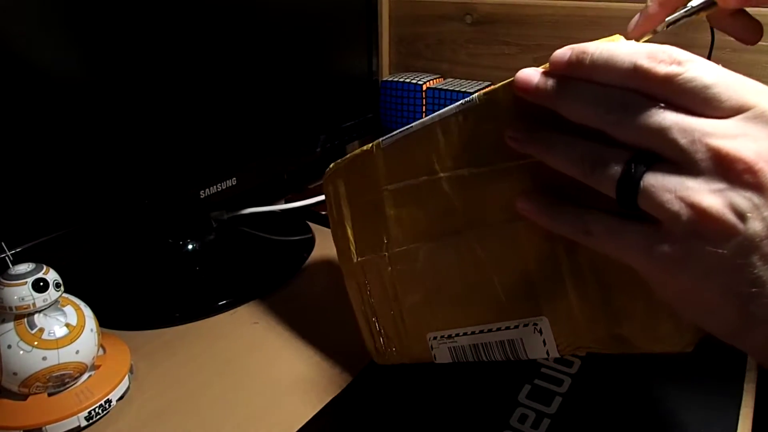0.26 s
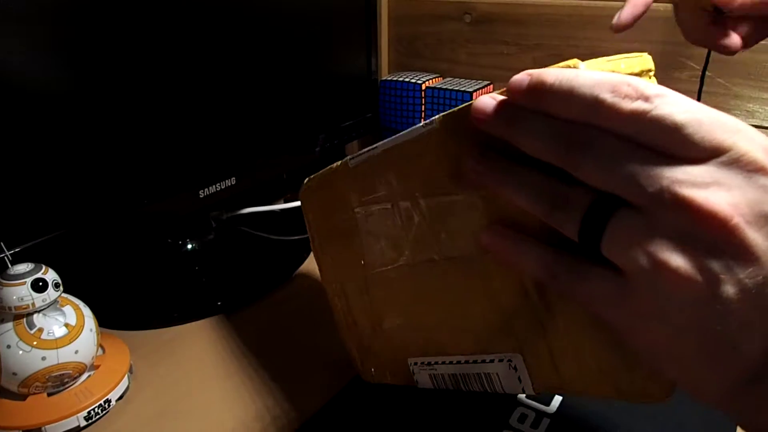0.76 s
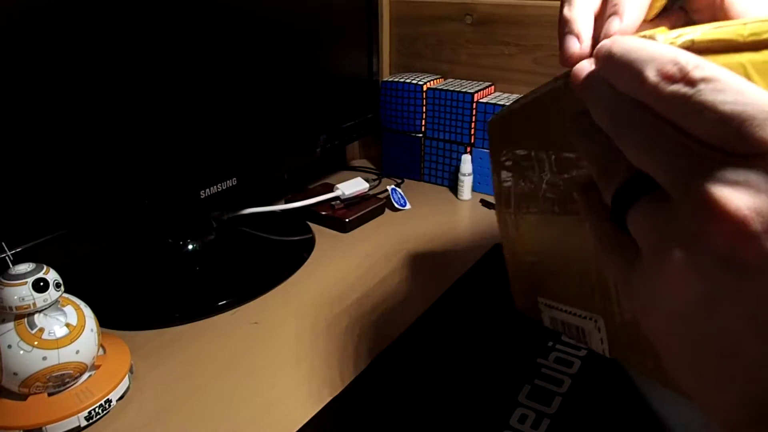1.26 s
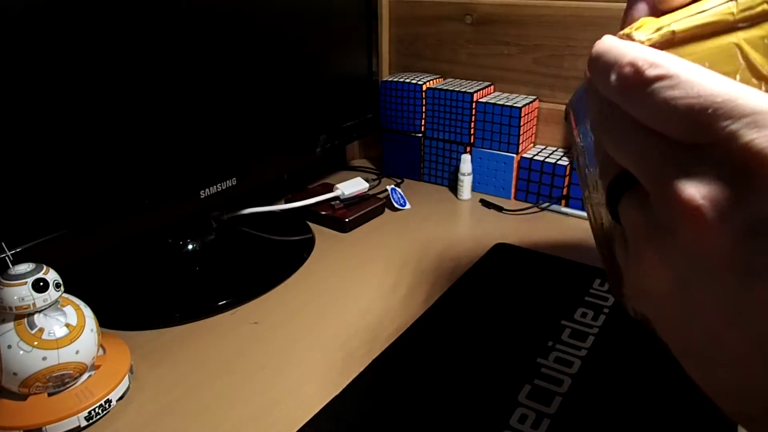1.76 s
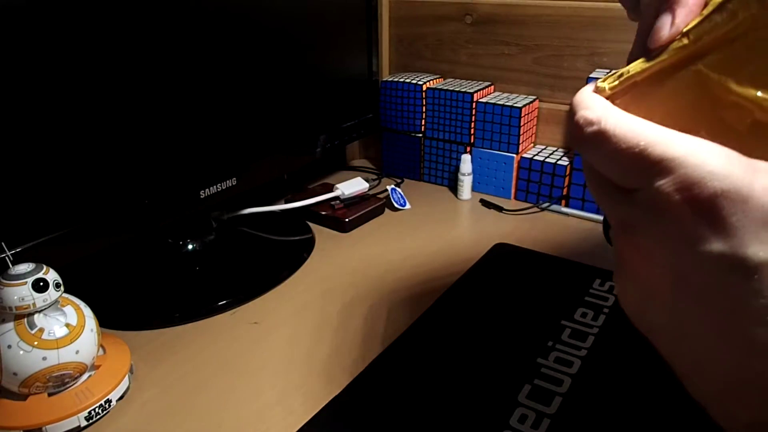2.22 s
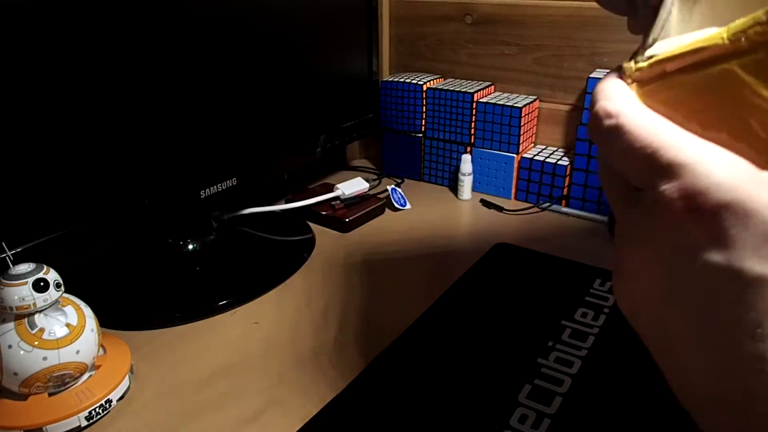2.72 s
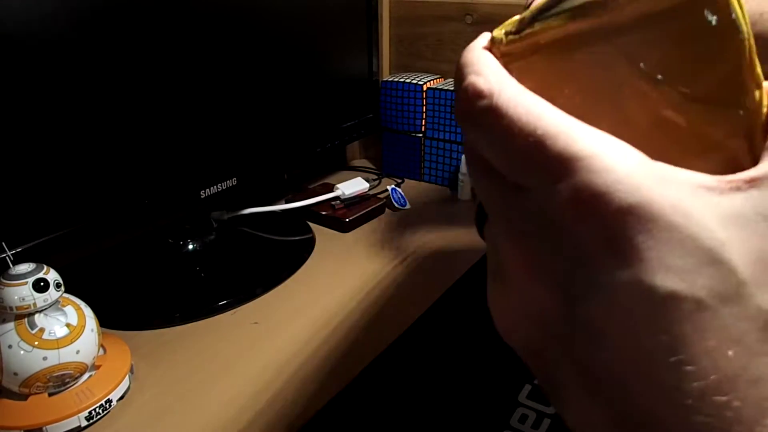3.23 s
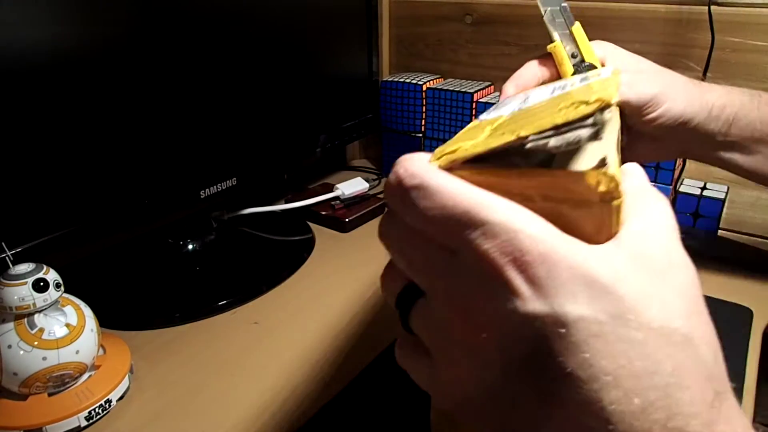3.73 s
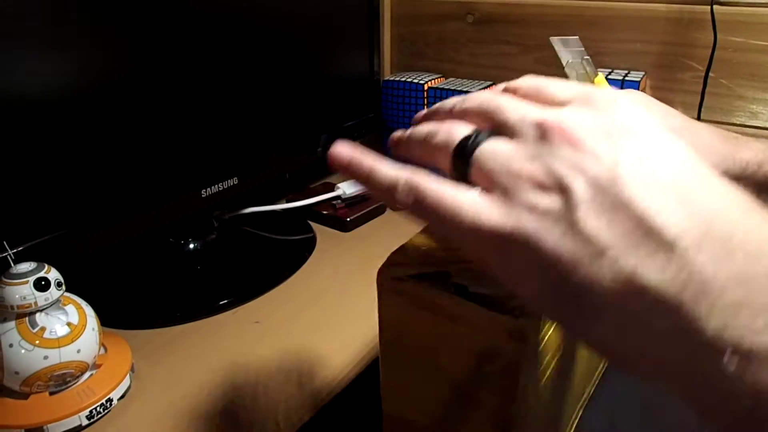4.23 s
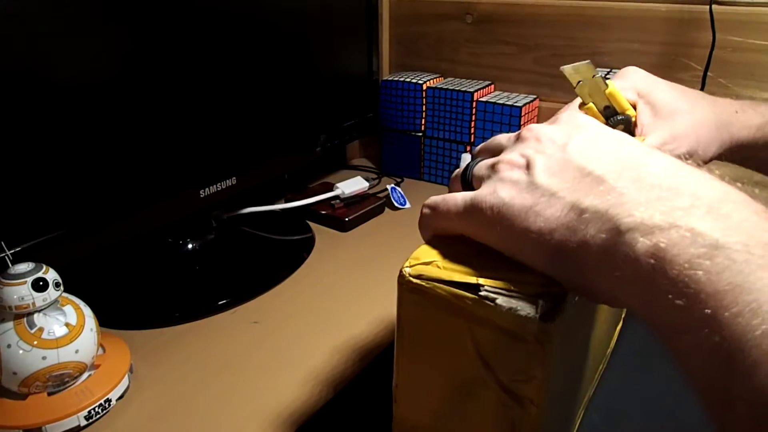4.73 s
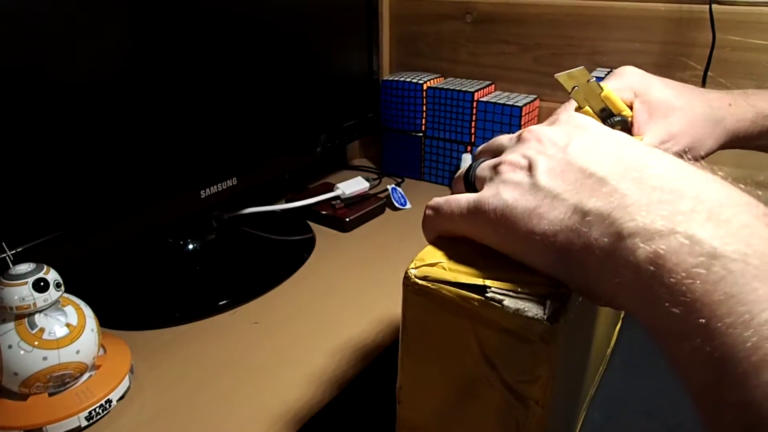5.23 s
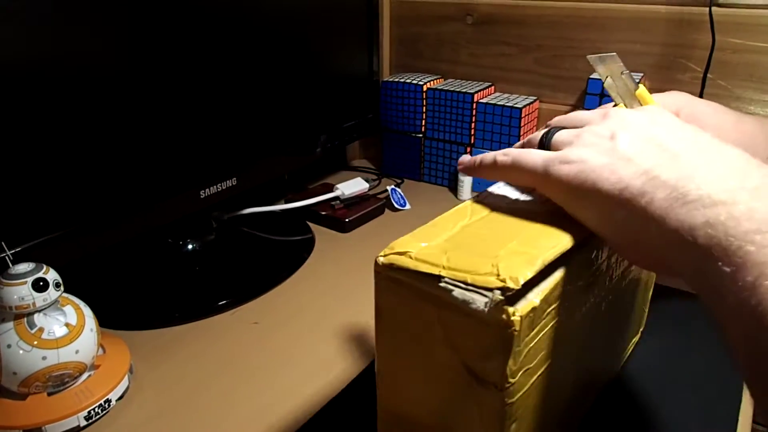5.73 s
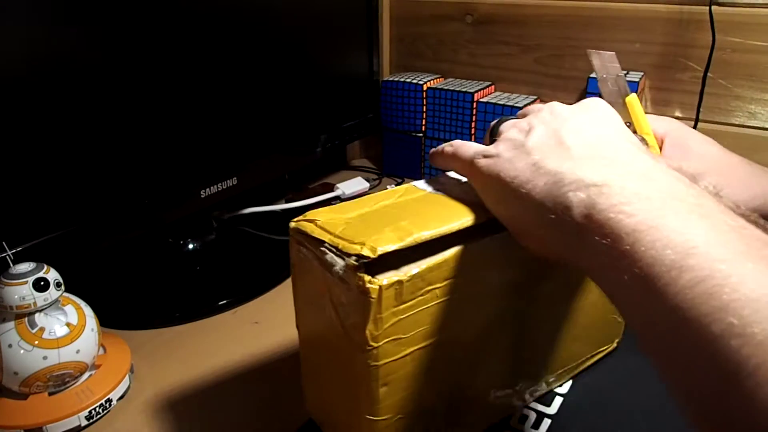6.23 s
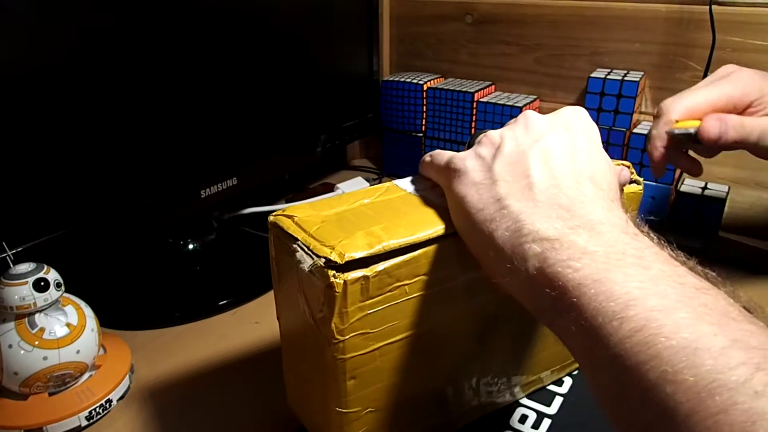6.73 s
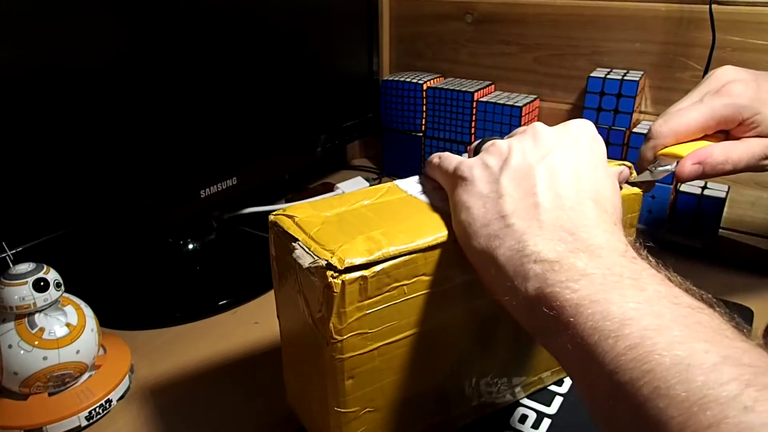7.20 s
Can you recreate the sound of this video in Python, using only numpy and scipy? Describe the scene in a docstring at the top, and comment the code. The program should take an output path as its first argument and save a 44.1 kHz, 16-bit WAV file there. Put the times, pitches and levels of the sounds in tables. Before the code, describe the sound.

A taped cardboard parcel is handled close up on a desk in a small room, over a steady, faint computer hum and hiss. A knife clicks and nicks the tape, then slits it with a short, juddering rasp from 0.3 to 0.5 seconds, ending in a hollow knock. Fingers slide over crinkling wrapping with scattered ticks and taps, and a sharp knock comes at 2.2 seconds. Crisp clicks at 2.5 seconds lead into a second brief slit, finished by 2.8. After more rubbing, the box is set down at about 4 seconds with clicks and a low thump in the desk top. A flap creaks briefly around 4.6 seconds, followed by a quick run of small knocks and clicks until 5. Softer hand strokes and occasional taps continue, with a last cluster of sharp clicks and scrapes just after 7 seconds.

```python
"""Opening a taped parcel on a desk

Close up in a small room, a snap-off knife clicks in its handle and slits the tape twice, its blade
catching on fibres. Fingers slide over the crinkling wrapping, and knocks ring the cardboard panels.
The box is set down with a thump that swings the desk top, then a flap creaks under the hand.
A computer hums behind."""
import sys
import numpy as np
from scipy import signal
from scipy.fft import rfft, irfft, next_fast_len
from scipy.io import wavfile

SR = 44100
rng = np.random.default_rng(int(sys.argv[2]) if len(sys.argv) > 2 else 0)


def store_wav(level_fs):
    """Save 16-bit WAV to argv[1]."""
    pcm = np.round(np.clip(np.atleast_2d(level_fs), -1, 1) * 32767)
    wavfile.write(sys.argv[1], SR, pcm.T.astype(np.int16))


N = 328986
T = np.arange(N) / SR


def undb(db):
    """Decibels to gain."""
    return 10 ** (np.asarray(db) / 20)


def unit(x):
    """Scale to rms 1."""
    return x / np.sqrt(np.mean(x ** 2) + 1e-20)


def curves(table):
    """Turn rows that begin with a time into one automation curve per remaining column."""
    times, *columns = np.transpose(table)
    return [np.interp(T, times, column) for column in columns]


def gains(eq, hz):
    """Gain of an EQ curve of (Hz, dB) points at the given frequencies."""
    points_hz, db = np.transpose(eq)
    return undb(np.interp(np.log(hz + 1), np.log(points_hz), db))


def colour(x, eq, size=2048):
    """Minimum-phase EQ: it rings only after a blow."""
    cepstrum = irfft(np.log(gains(eq, np.fft.rfftfreq(size, 1 / SR))))
    cepstrum[1:size // 2] *= 2
    cepstrum[size // 2 + 1:] = 0
    return signal.oaconvolve(x, irfft(np.exp(rfft(cepstrum))))[:len(x)]


def band(x, lo_hz, hi_hz, order=4):
    """Band-pass."""
    return signal.sosfilt(signal.butter(order, [lo_hz, hi_hz], "band", fs=SR, output="sos"), x)


def ringing(x, rings):
    """Add narrow resonances to a force."""
    return x + sum(undb(db) * signal.lfilter(*signal.iirpeak(hz, hz / width, SR), x)
                   for hz, width, db in rings)


def walk(per_s):
    """Smooth random wander of spread near 1."""
    steps = rng.standard_normal(4096)
    return 1.2 * np.interp(T * per_s, np.arange(len(steps)), steps)


def add(out, start, x):
    """Mix in a short sound at a start time in seconds."""
    i = int(start * SR)
    out[i:i + len(x)] += x[:N - i]


# EQ of the fan's rush and of the hiss. Each row: frequency in Hz, gain in dB.
FAN_EQ = [(12, -56), (20, -27.5), (43, -10), (97, -8), (196, -9.5), (267, -11), (371, -12), (405, -11.5),
          (483, -13.5), (515, -15.5), (550, -16), (873, -17.5), (1140, -19), (1690, -23.5), (3800, -38),
          (4940, -88), (8360, -120)]
HISS_EQ = [(2120, -15.5), (3600, -23), (3880, -11.5), (4340, -15), (4480, -1), (4830, -2), (5110, 9),
           (5470, 6), (6550, -0.5), (7710, 4.5), (9070, -2), (11000, -3), (11900, -4.5), (15000, -4.5),
           (16000, -15.5)]
# The computer's hum and whine. Each row: frequency in Hz, level in dB.
HUM_TONES = [(60, -66), (120, -62.5), (405, -63.5), (522.1, -52.5)]

def background():
    """A computer fan rushes and hums, wavering slightly, over a wide bed of microphone hiss."""
    def fan():
        return unit(colour(rng.standard_normal(N), FAN_EQ)) * undb(-53 + 0.5 * walk(0.94))

    def hiss():
        return unit(colour(rng.standard_normal(N), HISS_EQ)) * undb(-55)

    hum = np.zeros(N)
    for hz, db in HUM_TONES:
        peak = np.sqrt(2) * undb(db + 0.23 * walk(4.4))
        hum += peak * np.sin(2 * np.pi * hz * T + 0.044 * walk(2.1))
    mid = fan() + hiss() + hum
    side = undb(-3) * fan() + undb(-1.5) * hiss()
    return np.array([mid + side, mid - side])


def hardness(decay_s):
    """1 for a sharp release, less for a drawn-out crunch."""
    return min(0.0012 / decay_s, 1)


def release(decay_s, chatter, strike):
    """Force of a sudden release: a sharp strike, a short crunch, then weaker chatter through the flaps."""
    t = T[:4096]
    attack = np.minimum(t / .0004, 1)
    fade = np.exp(-t / decay_s) + chatter * np.exp(-t / .008)
    force = rng.standard_normal(len(t)) * attack * fade
    force /= np.linalg.norm(force)
    force[SR // 2000] += strike
    return force


# Panel resonances under blows and scrapes. Each row: frequency in Hz, width in Hz, gain in dB.
PANEL_RINGS = [(142.2, 8, -6.5), (302, 28, -1.5), (813, 64, -10), (1037, 120, -26), (1560, 15, -1.5),
               (1664, 55, 1)]
# EQ of a cardboard knock and of a tape or knife click. Each row: frequency in Hz, gain in dB.
KNOCK_EQ = [(100, -4), (200, -5.5), (300, -2), (480, 1), (650, 1.5), (900, 6.5), (1200, 3), (1400, 7.5),
            (1650, 2.5), (1900, -4.5), (2700, -12), (3600, -5.5)]
CLICK_EQ = [(1500, -44.5), (2200, -14), (3100, -14), (3900, -19), (4600, 1), (4870, 5), (5300, 13.5),
            (5750, 8), (6600, -3.5), (7900, -3.5), (9300, -19.5), (16000, -28.5)]

def snap(boom_db, knock_db, click_db, spit_db, decay_s):
    """A release booms and knocks in the box and clicks at its source; the treble spit dies first."""
    blow = release(decay_s + 0.0024, chatter=.18, strike=.97 * hardness(decay_s))
    box = colour(ringing(blow, PANEL_RINGS), KNOCK_EQ)
    spot_ring = [(rng.uniform(1800, 3490), 160, 4)]  # each spot of the wrapping has its own pitch
    crunch = release(decay_s, chatter=.1, strike=.45)
    click = colour(ringing(crunch, spot_ring), CLICK_EQ)
    spit = colour(release(.8 * decay_s, chatter=.08, strike=1.3), CLICK_EQ)
    layers = [(band(box, 122, 545, order=3), boom_db), (band(box, 573, 2970, order=3), knock_db),
              (band(click, 1800, 8700, order=3), click_db), (band(spit, 8320, 16000, order=3), spit_db)]
    # each level sets the first 10 ms of its layer
    return sum(x * undb(db) / np.sqrt(np.mean(x[:SR // 100] ** 2)) for x, db in layers)


# Each row: start in seconds, click level in dB, treble spit level in dB, decay in seconds.
CLICK_CUES = [(0.045, -40, -72, 0.005), (0.18, -31.5, -58, 0.0047), (0.2421, -34.5, -46, 0.014),
              (0.8164, -39.5, -46.5, 0.0032), (1.0293, -45, -48, 0.0044), (1.2375, -43, -39.5, 0.01),
              (1.4508, -39.5, -39, 0.0074), (1.5221, -30.5, -53, 0.00055), (1.5525, -48, -41, 0.00058),
              (1.7964, -39, -44, 0.0018), (1.9781, -48, -45, 0.001), (2.3467, -42.5, -41.5, 0.00062),
              (2.5181, -30, -37, 0.0024), (2.5302, -34, -35, 0.0046), (2.587, -34, -37, 0.0014),
              (2.614, -27, -31, 0.0006), (2.7811, -34.5, -40, 0.00081), (2.871, -50, -48, 0.001),
              (3.4622, -42, -44, 0.0037), (3.9827, -32.5, -57, 0.00087), (4.0207, -28, -61, 0.001),
              (4.0763, -21.5, -56, 0.0006), (4.452, -40, -47, 0.0075), (4.6176, -30, -45, 0.00031),
              (4.729, -25, -44, 0.0027), (4.8003, -28.5, -45, 0.00056), (4.9351, -29.5, -36, 0.003),
              (4.9744, -27, -38.5, 0.00029), (5.4465, -37, -62, 0.0042), (5.6774, -38.5, -39, 0.0042),
              (5.6942, -40.5, -54, 0.001), (6.0626, -43.5, -51, 0.0012), (6.473, -44.5, -58, 0.001),
              (7.096, -38.5, -46, 0.0027), (7.1598, -38, -67, 0.0019), (7.187, -29, -37.5, 0.0055),
              (7.2096, -34.5, -46, 0.0039), (7.2813, -31.5, -47, 0.0045), (7.3277, -42, -37, 0.0015),
              (7.3554, -25.5, -63, 0.0011)]

def clicks():
    """Sharp clicks of tape and knife, and of the flap as it slips its last, barely stirring the box."""
    out = np.zeros(N)
    for start, click_db, spit_db, decay_s in CLICK_CUES:
        boom_db, knock_db = click_db - 27.5, click_db - 19.5
        add(out, start, snap(boom_db, knock_db, click_db, spit_db, decay_s))
    return out


# Each row: start in seconds, levels of boom, knock and click in dB, crunch decay in seconds.
KNOCK_CUES = [(0.1431, -42, -39, -38, 0.0039), (0.4605, -25, -21, -36, 0.0011),
              (0.725, -55, -48, -52, 0.0026), (1.25, -67, -43.5, -49, 0.0052),
              (1.413, -40, -31, -31, 0.0015), (1.493, -34, -45, -65, 0.0039),
              (2.2195, -29, -18, -21.5, 0.0012), (2.6335, -33, -27.5, -19.5, 0.0021),
              (3.3009, -41.5, -38, -43.5, 0.0043), (3.482, -37, -48, -57, 0.0026),
              (3.611, -40, -45, -57, 0.0027), (4.0095, -32.5, -42, -30.5, 0.0028),
              (4.0912, -30, -38.5, -57, 0.003), (4.704, -34.5, -49, -54, 0.0019),
              (4.7472, -34.5, -44, -43, 0.0023), (4.7903, -34.5, -40.5, -45, 0.0015),
              (4.833, -33, -42, -40, 0.0015), (4.8713, -35, -40.5, -41.5, 0.003),
              (4.913, -34, -39, -43, 0.0015), (4.982, -33, -38, -48, 0.0021),
              (5.233, -39, -40.5, -51, 0.0049), (5.3124, -48, -45, -38.5, 0.0013),
              (5.523, -41, -52, -44.5, 0.0013), (5.605, -51, -40, -35, 0.0025),
              (6.383, -41, -40, -47.5, 0.011), (6.516, -42, -38.5, -37.5, 0.0044),
              (6.6321, -55, -49, -46.5, 0.0026), (6.7574, -43, -40, -34, 0.0069),
              (6.964, -61, -50, -49, 0.005), (7.028, -61, -53, -58, 0.003),
              (7.3187, -49, -38.5, -27, 0.0022)]

def knocks():
    """The box booms as it is knocked or a flap gives way; harder hits spit more treble."""
    out = np.zeros(N)
    for start, boom_db, knock_db, click_db, decay_s in KNOCK_CUES:
        spit_db = click_db - 6 + 20 * np.log10(hardness(decay_s))
        add(out, start, snap(boom_db, knock_db, click_db, spit_db, decay_s))
    return out


def fibres(per_s, spread_db, smooth):
    """Tiny catches of uneven size over a share of smooth friction."""
    sizes = undb(spread_db * np.minimum(rng.exponential(size=N), 3))
    catches = (rng.random(N) < per_s / SR) * sizes * rng.choice([-1, 1], N)
    return unit(catches) + smooth * rng.standard_normal(N)


def stroke(start, length, attack_s, release_s=0.028):
    """Contact builds up, holds, then dies away."""
    rise = np.clip((T - start) / attack_s + .5, 0, 1)
    return rise * np.exp(-np.maximum(T - start - length, 0) / release_s)


def friction(force, board_gain, rasp_gain, board_eq, rasp_eq, board_trim_db, rasp_trim_db):
    """One scraping force shakes the cardboard and rasps at the point of contact."""
    board = unit(band(colour(ringing(force, PANEL_RINGS), board_eq), 60, 2855))
    rasp = unit(band(colour(force, rasp_eq), 2810, 18000))
    return board * board_gain * undb(board_trim_db) + rasp * rasp_gain * undb(rasp_trim_db)


# The nick before each slit. Each row: start and length in seconds, cardboard and rasp faders in dB.
BLADE_NICKS = [(0.148, 0.046, -35.5, -38), (2.508, 0.024, -45, -36.5)]
# The two draws of the blade. Each row: time in seconds, cardboard and rasp faders in dB.
FIRST_DRAW = [(0.29, -50, -50), (0.336, -37.5, -38), (0.358, -33.5, -26.5), (0.396, -23, -22),
              (0.432, -29.5, -18.5), (0.462, -19.5, -17), (0.478, -30.5, -43), (0.49, -47.5, -44)]
SECOND_DRAW = [(2.611, -35, -20.5), (2.633, -33, -17), (2.663, -27, -24.5), (2.679, -22.5, -19),
               (2.709, -31, -24.5), (2.727, -42, -36.5), (2.75, -52, -41)]
# EQ of the cardboard and of the tape rasp at each cut. Each row: frequency in Hz, gain in dB.
FIRST_BOARD_EQ = [(90, -10.5), (200, -9.5), (320, -1), (430, -2), (560, -2), (660, -14), (800, -4),
                  (1100, -13), (1300, -8), (1520, -13), (1850, -17), (2300, -14), (2700, -20.5),
                  (3500, -11)]
FIRST_RASP_EQ = [(2120, -68.5), (3600, -23.5), (4100, -23.5), (4590, -10.5), (5070, -3.5), (5370, -14),
                 (5640, -2), (5970, -15), (6080, -5), (6930, -17), (8210, -15.5), (9070, -24.5),
                 (11100, -29), (15100, -30), (16000, -35)]
SECOND_BOARD_EQ = [(59, -53.5), (100, -52), (174, -9), (210, -41), (309, -5), (349, -13), (440, 4.5),
                   (546, -2), (599, -2), (699, -4), (1040, 2.5), (1150, -5.5), (1770, -5.5), (1910, -7),
                   (4000, -7.5), (5200, -70), (8800, -120)]
SECOND_RASP_EQ = [(2120, -26.5), (3600, -24.5), (3740, -14), (4080, -31.5), (4450, -7), (4770, -20),
                  (4890, -5), (5240, -1), (6930, -11), (8100, -9.5), (9410, -22), (11200, -22.5),
                  (14800, -24), (15700, -31), (16000, -60)]
# Rings the blade draws out. Each row: frequency in Hz, width in Hz, gain in dB.
FIRST_BLADE_RINGS = [(5680, 70, -2), (5440, 60, 6), (6500, 25, -21), (1480, 130, 10.5)]
SECOND_BLADE_RINGS = [(5250, 71, 3), (741, 22, 5), (7450, 30, 5)]

def slit(nick, draw, board_eq, rasp_eq, rings, board_trim_db, rasp_trim_db, judder_db):
    """The blade nicks the tape, then sinks in and parts the fibres in a dense, juddering run."""
    catches = fibres(per_s=3200, spread_db=4.2, smooth=.35)
    force = ringing(catches * undb(judder_db * walk(260)), rings)
    start, length, nick_board_db, nick_rasp_db = nick
    draw_board_db, draw_rasp_db = curves(draw)
    nicking = stroke(start, length, attack_s=0.022)
    bite_s = 0.0041
    drawing = np.clip((T - draw[0][0]) / bite_s, 0, 1) * (T < draw[-1][0])
    board_gain = nicking * undb(nick_board_db) + drawing * undb(draw_board_db)
    rasp_gain = nicking * undb(nick_rasp_db) + drawing * undb(draw_rasp_db)
    return friction(force, board_gain, rasp_gain, board_eq, rasp_eq, board_trim_db, rasp_trim_db)


# The box is jolted, lands, rocks and is leant on.
# Each row: start in seconds, level in dB, centre of the push in Hz.
THUMP_CUES = [(0.461, -43.5, 164), (4.006, -44, 75), (4.034, -31, 68.5), (4.095, -37, 60.7),
              (4.137, -39.5, 70), (4.486, -46.5, 85), (4.791, -46, 85.5), (5.797, -51.5, 132)]
# Each row: frequency in Hz, gain in dB, seconds to fade by 60 dB.
DESK_MODES = [(32.8, -1.5, 1), (61, 14, 0.17), (77.1, 6, 0.32), (116.4, 18.5, 0.13), (147, -18.5, 0.058)]

def thumps():
    """The weight of the box sets the desk top swinging; a quicker push favours its higher modes."""
    out, t = np.zeros(N), T[:SR // 2]
    attack = 1 - np.exp(-t / 0.0069)
    for start, db, push_hz in THUMP_CUES:
        for hz, mode_db, t60 in DESK_MODES:
            share = np.exp(-2.5 * np.log(hz / push_hz) ** 2)
            swing = np.sin(2 * np.pi * hz * t) * np.exp(-np.log(1000) * t / t60) * attack
            add(out, start, undb(db + mode_db) * share * swing)
    return out


# Hand strokes; light, fast ones are glossier than slow pressing.
# Each row: start and length in seconds, cardboard and rasp faders in dB, treble lift in dB.
RUB_CUES = [(0.466, 0.1, -47.5, -48, -1), (0.826, 0.1, -67, -56, 6), (1.412, 0.028, -49.5, -50, -4),
            (1.662, 0.14, -53, -49, 0), (2.347, 0.045, -70, -45.5, 6), (2.443, 0.24, -64.5, -50.5, 17),
            (2.889, 0.065, -56.5, -49, 2), (3.062, 0.15, -49.5, -40.5, 5.5), (3.276, 0.11, -48.5, -48, 5),
            (3.471, 0.16, -47, -46.5, -1), (3.976, 0.05, -44.5, -37.5, -3),
            (4.107, 0.032, -39.5, -35, -0.5), (4.453, 0.46, -51, -46.5, -1), (4.515, 0.1, -44, -67, -17),
            (5.225, 0.115, -47.5, -42.5, -2), (5.384, 0.45, -61, -51, -4), (5.995, 0.31, -68, -47.5, -1),
            (6.488, 0.034, -53, -50, -6), (6.6, 0.18, -62, -54, -14), (7.169, 0.04, -49.5, -49, 3),
            (7.279, 0.058, -46.5, -41, 3)]
# EQ of the cardboard and of the tape rasp under the fingers. Each row: frequency in Hz, gain in dB.
RUB_BOARD_EQ = [(60, -20.5), (95, 0), (135, -11.5), (200, -15), (290, -12), (500, -9), (620, -19.5),
                (850, -15.5), (1450, -16), (1900, -28.5), (2200, -17.5), (2650, -40), (3050, -16.5),
                (3900, -26)]
RUB_RASP_EQ = [(2120, -28), (3600, -18), (3900, -22), (4080, -26), (4510, -5), (4770, -23), (5040, 3.5),
               (5300, 1.5), (6430, -7), (7200, -14), (7850, -6.5), (9530, -21), (11300, -20.5),
               (14800, -24), (16000, -19.5)]

def hands():
    """Skin slides on the tape: mostly smooth friction, with small catches."""
    force = fibres(per_s=240, spread_db=4.5, smooth=2.6) * undb(3.95 * walk(70))
    starts, lengths, board_db, rasp_db, lift_db = np.transpose(RUB_CUES)
    touches = np.array([stroke(start, length, attack_s=0.087) for start, length in zip(starts, lengths)])
    rub = friction(force, undb(board_db) @ touches, undb(rasp_db) @ touches, RUB_BOARD_EQ, RUB_RASP_EQ,
                   board_trim_db=3, rasp_trim_db=0.1)
    treble = signal.sosfiltfilt(signal.butter(2, 8500, "high", fs=SR, output="sos"), rub)
    lift = undb(np.interp(T, starts + lengths / 2, lift_db))
    return rub + (lift - 1) * treble


def crinkles(per_s=14, spread_db=1.5):
    """The wrapping gives at random moments of the strokes, as strongly as the hand rubs."""
    out = np.zeros(N)
    for start, length, board_db, rasp_db, lift_db in RUB_CUES:
        for _ in range(round(per_s * length)):
            moment = start + length * rng.random()
            size_db = -2 + spread_db * rng.standard_normal()
            box_db, click_db = board_db + size_db, rasp_db + size_db
            spit_db = click_db - 12 + lift_db
            add(out, moment, snap(box_db, box_db, click_db, spit_db, decay_s=0.0016))
    return out


# The flap slipping under the hand. Each row: time in seconds, mean slips per second, level in dB.
CREAK_MOVE = [(4.48, 152, -50), (4.512, 137, -37.5), (4.55, 142, -36), (4.585, 113, -33.5), (4.6, 92, -37),
              (4.655, 79, -37.5), (4.685, 59, -36), (4.697, 50, -52)]
# EQ of the flap. Each row: frequency in Hz, gain in dB.
FLAP_EQ = [(30, -35), (70, -3), (170, -7), (300, 2.5), (400, -5.5), (540, 5.5), (750, -13), (1100, -18.5),
           (1600, -10), (1900, -31), (2150, -14.5), (2650, -29), (3050, -38), (3900, -36), (5300, -12),
           (6500, -51), (9000, -47)]

def creak():
    """A flap sticks and slips in uneven, slowing jerks; each drags a little grit along."""
    rate, db = curves(CREAK_MOVE)
    slip_count = np.floor(np.cumsum(rate * np.exp(.09 * walk(140))) / SR)
    slips = np.diff(slip_count, prepend=0)
    moving = (T > CREAK_MOVE[0][0]) * (T < CREAK_MOVE[-1][0])
    slips *= undb(walk(150) + db) * np.sqrt(SR / rate) * moving
    drag = np.exp(-T[:SR // 50] / .0009)
    grit = signal.oaconvolve(slips, drag / np.linalg.norm(drag))[:N] * rng.standard_normal(N)
    flap = colour(signal.unit_impulse(SR // 20), FLAP_EQ)
    return signal.oaconvolve(1.3 * slips + .35 * grit, flap / np.linalg.norm(flap))[:N]


def room(x, wet_db, low_t60, high_t60):
    """Short diffuse tail of a furnished room."""
    t = T[:SR // 2]
    noise = rng.standard_normal(len(t))
    low = band(noise, 48, 3200, order=2) * np.exp(-np.log(1000) * t / low_t60)
    high = band(noise, 2000, 8900, order=2) * np.exp(-np.log(1000) * t / high_t60)
    tail = (low + 1.07 * high) * np.clip(t / 0.0011 - .3, 0, 1)
    return undb(wet_db) * signal.oaconvolve(x, tail / np.linalg.norm(tail))[:N]


# Stereo width. Each row: frequency in Hz, side level against mid in dB.
SIDE_EQ = [(60, -2), (200, -60), (600, -24), (2400, -57), (4400, -15.5), (6000, -9), (8100, -4),
           (11000, -2.5), (15000, 3)]

def widen(x):
    """Left and right agree in the mids and drift apart in deep bass and treble, anew for each source."""
    size = next_fast_len(N + 2048)
    hz = np.fft.rfftfreq(size, 1 / SR)
    phase = np.interp(hz / 200, np.arange(128), rng.standard_normal(128)) - np.pi / 2
    side = irfft(rfft(x, size) * gains(SIDE_EQ, hz) * np.exp(1j * phase), size)[:N]
    return np.array([x + side, x - side])


def scene():
    """Knife, hands and box in the room, over the computer's hum."""
    first = slit(BLADE_NICKS[0], FIRST_DRAW, FIRST_BOARD_EQ, FIRST_RASP_EQ, FIRST_BLADE_RINGS,
                 board_trim_db=-1.5, rasp_trim_db=-0.9, judder_db=-0.7)
    second = slit(BLADE_NICKS[1], SECOND_DRAW, SECOND_BOARD_EQ, SECOND_RASP_EQ, SECOND_BLADE_RINGS,
                  board_trim_db=-0.5, rasp_trim_db=0, judder_db=2)
    sources = [first, second, hands() + creak() + thumps(), clicks() + crinkles(), knocks()]
    send = sum(sources)
    tail = room(send, wet_db=-15.5, low_t60=0.22, high_t60=0.18)
    # the room's treble arrives from all sides, its bass stays near the centre
    side = room(send, wet_db=-26.5, low_t60=0.11, high_t60=0.12)
    side = 0.1 * side + band(side, 5300, 16000, order=2)
    return sum(widen(x) for x in sources) + tail + np.array([side, -side]) + background()


def record(dry, top_hz=15900):
    """A steep low-pass takes off the very top."""
    return signal.sosfilt(signal.ellip(10, .2, 70, top_hz, fs=SR, output="sos"), dry)


dry = scene()
out = record(dry)
store_wav(out)
```